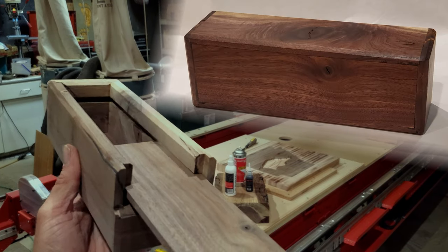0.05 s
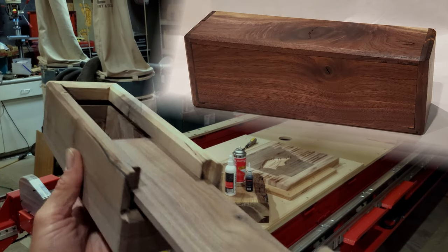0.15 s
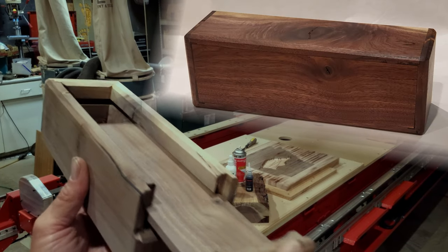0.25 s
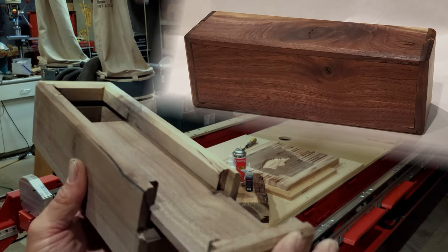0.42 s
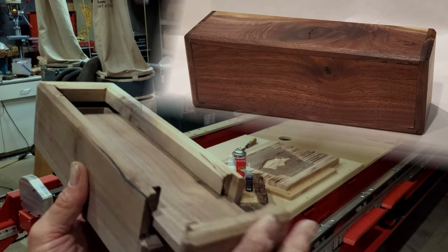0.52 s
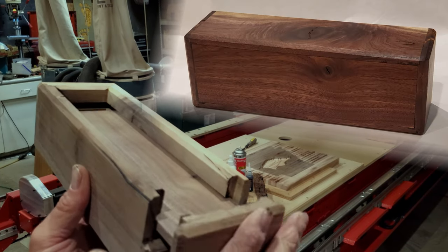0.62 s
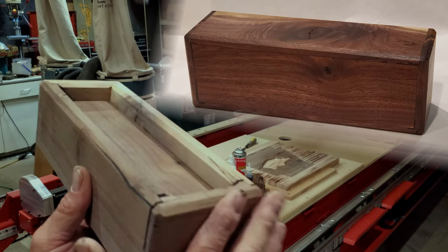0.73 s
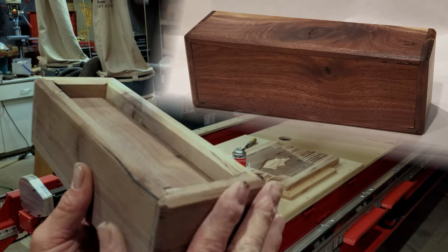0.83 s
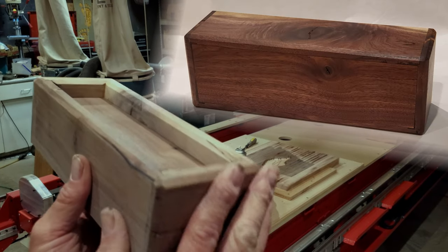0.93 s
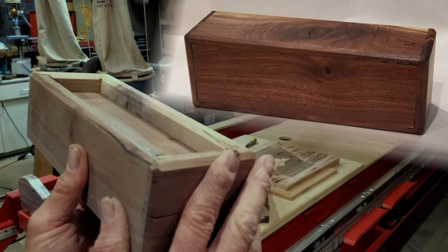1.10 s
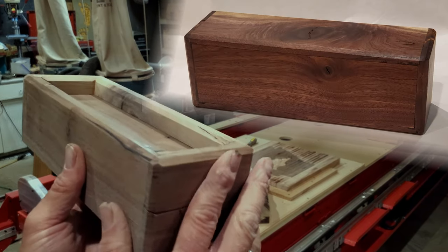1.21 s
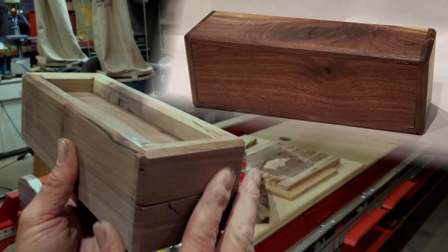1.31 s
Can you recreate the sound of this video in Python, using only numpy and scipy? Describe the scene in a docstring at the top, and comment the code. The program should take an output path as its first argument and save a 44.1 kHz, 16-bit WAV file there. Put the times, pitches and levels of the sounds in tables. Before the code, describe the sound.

Close up in a faintly humming workshop, a small wooden box's lid is pushed along with three hollow scrapes and one short hoot. It closes with a sharp knock and a short echo, followed by light finger taps.

```python
"""A small workshop hums while fingers brush a little wooden box held in the hand.
The lid is pushed along its grooves in three shoves: the rubbing wood hisses and rings a hollow
note that sinks as the box closes. During the first shove the lid catches and hoots briefly.
The third shove ends with the lid knocking shut, and the room answers with a short echo.
Last, the fingers tap and brush the wood again."""
import sys
import numpy as np
from scipy import signal
from scipy.fft import rfft, irfft
from scipy.io import wavfile
from scipy.ndimage import uniform_filter1d

SR = 44100
rng = np.random.default_rng(int(sys.argv[2]) if len(sys.argv) > 2 else 0)


def to_wav(sig):
    """Store sig (one row per channel, or 1-D mono) as 16-bit WAV at the path in sys.argv[1].

    Samples outside -1..1 are clipped; the rate is SR.
    """
    pcm = np.clip(np.atleast_2d(sig), -1, 1) * 32767
    pcm = np.round(pcm).astype(np.int16)
    wavfile.write(sys.argv[1], SR, pcm.T)  # frames by channels


N = 59535
T = np.arange(N) / SR
HZ = np.fft.rfftfreq(2 * N, 1 / SR)

# tone of the room air (frequency [Hz], gain [dB])
AIR_TONE = [(20, -27), (45, -6), (110, -4.5), (150, -7), (210, -4), (380, -10), (520, -11.5), (750, -13),
            (1500, -29.5), (4000, -28), (8000, -33), (15500, -37.5)]
# hum of the machines (pitch [Hz], level [dB], width [Hz])
MACHINE_HUM = [(67.7, -62, 10), (96.7, -64, 2.1), (212.3, -65, 2), (280, -79, 3.5), (376, -70.5, 7.7)]
# rise and fall of air and hum together (time [s], gain [dB])
AIR_AND_HUM_GAIN = [(.1, 2), (.75, 1.5), (1.05, -3.5), (1.3, -4)]
# rumble of the held box (time [s], level [dB])
RUMBLE_LEVEL = [(0, -59), (.25, -59), (.35, -54), (.48, -61), (.62, -55), (.85, -53), (1.05, -63),
                (1.35, -57)]
# echoes off bench, floor and walls (delay [s], gain [dB])
ROOM_ECHOES = [(.0062, -21), (.0145, -17), (.0225, -13.5), (.0402, -23)]
# how long the room rings on (frequency [Hz], time to fade by 60 dB [s])
TAIL_FADE = [(150, 0.31), (550, 0.35), (1400, 0.38), (2300, .41), (4000, 0.35), (7000, .33), (14000, .3)]
# tone of that ringing tail (frequency [Hz], gain [dB])
TAIL_TONE = [(150, -4.5), (550, -3.5), (1400, -5), (2200, -9), (3200, -7.5), (4200, -10.5), (5500, -11),
             (8500, -4.5), (14000, -7)]
# shading of the far microphone, for sound from the box (frequency [Hz], gain [dB])
FAR_TONE = [(70, -3.5), (250, -5.5), (550, -4), (950, -9.5), (1450, -10), (2200, -7), (3000, -8),
            (4000, -8.5), (5500, -18), (8500, -17), (12000, -10)]
# the same for sound from all round the room (frequency [Hz], gain [dB])
FAR_ROOM_TONE = [(150, -1.5), (550, -6), (1400, -6.5), (2200, -8.5), (4000, -10.5), (6000, -15.5),
                 (8500, -14.5), (12000, -4)]
# skin brushing the wood (time [s], level [dB])
BRUSH_LEVEL = [(0, -54.5), (.02, -51), (.045, -66.5), (.14, -65.5), (.5, -94), (.93, -74), (.97, -66.5),
               (1.03, -72), (1.22, -76), (1.25, -57.5), (1.3, -55), (1.35, -54)]
# tone of the brushing (frequency [Hz], gain [dB])
BRUSH_TONE = [(300, -1.5), (700, 0), (1000, -3), (2000, -2.5), (3300, 4), (4200, -1), (4800, 3.5),
              (6500, 6), (8000, -4), (12500, -0.5), (15500, 0.5)]
# fingers settling on the box (time [s], level [dB], treble limit [Hz], fade time [s])
FINGER_TAPS = [(0.899, -35, 1850, 0.01), (.975, -52.5, 3000, .006), (1.122, -53, 12180, .004)]
# the lid meets the end wall, corner after corner (time [s], relative level [dB])
LID_HITS = [(0.764, -12.5), (0.7627, 0), (0.7631, -3), (.7642, -4), (0.7655, -0.5)]
# tone of the crack of each hit (frequency [Hz], gain [dB])
CRACK_TONE = [(60, -48.5), (160, -30), (235, 5), (400, -10), (650, -5.5), (850, -5), (1100, -9.5),
              (1500, -0.5), (1800, -3.5), (2250, 5), (2800, 3.5), (4100, -1.5), (4600, -12), (6200, -18),
              (7600, -34), (11000, -34), (15500, -43)]
# notes the shut box rings with (pitch [Hz], level [dB], time to fade by 60 dB [s])
BOX_NOTES = [(224, -29.5, .1), (276, -31.5, .12), (477, -38, 0.27), (661, -29.5, 0.19), (786, -33, 0.16),
             (864, -21.5, .05), (1102, -26.5, 0.11), (1388, -24.5, 0.31), (1415, -23.5, .25),
             (1553, -8.5, 0.05), (2092, -25, 0.068), (2472, -19, 0.041), (3040, -12, .03),
             (3958, -5.5, 0.016), (5346, -17, 0.02)]
# the lid catches and slips regularly
# (start [s], rise [s], hold [s], release [s], pitch [Hz], glide [Hz/s], level [dB], relative rasp [dB])
LID_CATCHES = [(0.195, 0.011, 0.002, 0.013, 693, -300, -32, -23),
               (0.227, 0.014, 0.0045, .011, 667.4, -400, -24, -34),
               (0.3209, 0.0088, .017, .015, 555.4, -150, -13.5, -13.5)]
# force of the rubbing, shove by shove (time [s], level [dB])
SHOVE_LEVEL = [(.135, -80), (.154, -45), (.195, -36.5), (.245, -34.5), (.275, -33), (.326, -31.5),
               (.342, -55), (.44, -63), (.49, -77.5), (.516, -41.5), (.56, -32), (.598, -33.5),
               (.635, -51.5), (.695, -58), (.73, -36), (.76, -35), (.768, -83)]
# a moment within each of the three shoves (time [s])
SHOVE_TIMES = [.25, .57, .74]
# tone of the rubbing hiss (frequency [Hz], gain [dB])
HISS_TONE = [(100, -26), (220, -15.5), (400, -8.5), (850, -9.5), (1300, -5), (2200, -2), (3700, -2.5),
             (5000, -2.5), (6700, -6.5), (7500, -14.5), (10000, -16.5), (15500, -19.5)]
# notes the lid rings with (pitch [Hz], width [Hz], gain in shove 1 [dB], in 2 [dB], in 3 [dB])
LID_NOTES = [(1291, 210, -13, -12.5, -2), (1995, 120, -9.5, -20, -10.5), (2933, 250, -6.5, 0, -11.5),
             (4535, 220, -16, -13.5, -8), (6500, 294, -8, -23.5, -18)]
# hollow note of the closing box (time [s], pitch [Hz], level relative to the rubbing [dB])
HOLLOW_NOTE = [(.15, 770, -8), (.21, 674, -4), (.26, 678, -3), (.31, 605, -3), (.53, 530, -4.5),
               (.6, 533, -3.5), (.66, 468, 4), (.75, 504, -7)]

TREBLE_LIMIT_HZ = 15850


def amp(db):
    """Turns decibels into a number to multiply by."""
    return 10 ** (np.asarray(db) / 20)


def unit(x):
    """Scales a sound to an average strength (rms) of 1."""
    return x / np.sqrt(np.mean(x ** 2) + 1e-20)


def curve(rows):
    """Draws each column of a time table as a line through every sample."""
    times, *columns = np.transpose(rows)
    return [np.interp(T, times, column) for column in columns]


def read(points, hz):
    """Looks up a frequency table, with the octaves evenly spaced."""
    frequencies, values = np.transpose(points)
    return np.interp(np.log(hz + 1), np.log(frequencies), values)


def colour(x, tone):
    """Gives a sound the tone in a table; the filter rings only after the sound, never before."""
    log_gain = np.log(amp(read(tone, abs(np.fft.fftfreq(2 * N, 1 / SR)))))
    response = np.exp(np.conj(signal.hilbert(log_gain)))[:N + 1]
    return irfft(rfft(x, 2 * N) * response)[..., :N]


def resonate(x, hz, width):
    """Makes a sound ring around a steady or moving pitch."""
    turn = np.exp(2j * np.pi * np.cumsum(hz * np.ones(N)) / SR)
    decay = np.exp(-np.pi * width / SR)
    # shift the pitch down to zero, smooth, then shift back up
    smoothed = signal.lfilter([(1 - decay) ** 2], [1, -2 * decay, decay ** 2], x / turn)
    return unit((turn * smoothed).real)


def drone(hz, width):
    """Steady narrow noise around one pitch."""
    spectrum = rfft(rng.standard_normal(2 * N))
    return unit(irfft(spectrum / (1 + (2 * (HZ - hz) / width) ** 4))[:N])


def drift():
    """A slow random wobble."""
    return drone(0, width=50)


def both_sides(pair):
    """Sound from all round the room is duller at the far microphone."""
    return np.array([pair[0], colour(pair[1], FAR_ROOM_TONE)])


def background():
    """Room air, machine hum and the rumble of the held box; the bass is alike on both sides."""
    shared = colour(rng.standard_normal(N), [(300, -1), (2000, -8.5)])
    apart = colour(rng.standard_normal((2, N)), [(150, -6.5), (1200, -0.5)])
    air = amp(-59.5) * both_sides(unit(colour(shared + apart, AIR_TONE)))
    hum = sum(amp(db) * drone(hz, width) for hz, db, width in MACHINE_HUM)
    rumble = amp(curve(RUMBLE_LEVEL)[0]) * drone(hz=62, width=30)
    return (air + hum) * amp(curve(AIR_AND_HUM_GAIN)[0]) + rumble


def room_tail(sound, echoes_per_s=4000, build_up_s=0.013):
    """Countless small echoes blur into a short fading tail."""
    echoes = rng.standard_normal((2, N)) * (rng.random((2, N)) < echoes_per_s / SR)
    hz, t, bands = signal.stft(echoes, SR, nperseg=256)
    fade = amp(-60 * t / read(TAIL_FADE, hz)[:, None])
    tail = signal.istft(bands * fade, SR, nperseg=256)[1][:, :N]
    tail *= np.minimum(T / build_up_s, 1)
    tail = colour(unit(tail) / np.sqrt(N), TAIL_TONE)
    return both_sides(signal.fftconvolve(sound[None], tail, axes=1)[:, :N])


def workshop(sources, far_lag_s=0.00013):
    """Each (sound, gain into the room [dB]) reaches the left microphone first and sets off echoes."""
    direct = sum(sound for sound, db in sources)
    sent = sum(sound * amp(db) for sound, db in sources)
    echoes = sum(amp(db) * np.interp(T - delay, T, sent, left=0) for delay, db in ROOM_ECHOES)
    near = direct + colour(echoes, [(1800, -0.5), (5000, -13)])
    far = np.interp(T - far_lag_s, T, colour(near, FAR_TONE), left=0)
    return np.array([near, far]) + room_tail(sent)


def friction(slips_per_s=14000, spread_db=2.0, flutter_db=0.2):
    """Rubbing is a stream of tiny slips of uneven size, with a slight flutter."""
    size = amp(spread_db * np.minimum(rng.exponential(1, N), 4)) * rng.standard_normal(N)
    flutter = unit(uniform_filter1d(rng.standard_normal(N), size=300))
    slipping = rng.random(N) < slips_per_s / SR
    return unit(size * slipping * amp(flutter_db * flutter))


def fingers():
    """Skin brushes over the wood and fingertips land with soft taps."""
    out = amp(curve(BRUSH_LEVEL)[0]) * unit(colour(friction(), BRUSH_TONE))
    for start, db, hz, fade_s in FINGER_TAPS:
        puff = rng.standard_normal(N) * (T > start) * np.exp(-abs(T - start) / fade_s)
        dulled = signal.lfilter(*signal.butter(4, hz, fs=SR), puff)
        out += amp(db) * dulled * np.sqrt(SR / (2 * hz))  # makes up the strength lost in dulling
    return out


def knock(crack_db=15, splinter_gain=0.067, splinter_s=0.002, ring_rise_s=0.001):
    """The lid hits the end wall with quick splintery cracks, and the shut box rings."""
    cracks = np.zeros(N)
    for start, db in LID_HITS:
        t = T - start
        click = signal.unit_impulse(N, round(start * SR))
        splinters = splinter_gain * rng.standard_normal(N) * (t > 0) * np.exp(-abs(t) / splinter_s)
        cracks += amp(db + crack_db) * (click + splinters)
    first_hit = min(start for start, db in LID_HITS)
    t = np.maximum(T - first_hit, 0)
    ring = sum(amp(db - 60 * t / fade_s) * np.sin(2 * np.pi * hz * t) for hz, db, fade_s in BOX_NOTES)
    return colour(cracks, CRACK_TONE) + ring * (1 - np.exp(-t / ring_rise_s))


def hoot(start, rise, hold, release, hz, glide, db, rasp_db, rasp_s=0.014):
    """The lid sticks and slips near the pitch of the hollow note: raspy at first, then nearly pure."""
    t = np.maximum(T - start, 0)
    swell = np.interp(t, np.cumsum([0, rise, hold, release]), [0, 1, 1, 0])
    phase = 2 * np.pi * (hz * t + glide * t ** 2 / 2)
    overtones = sum(np.sin(k * phase) / k for k in range(2, 6))
    rasp = 0.45 * overtones + resonate(friction(), hz=1347, width=600)
    rasp_fade = (t > 0) * np.exp(-t / rasp_s)
    return amp(db) * (swell * np.sin(phase) + amp(rasp_db) * rasp_fade * rasp)


def scrape(hiss_db=-2.5, swell_db=2.0, wander_share=0.0092):
    """Rubbing in the grooves hisses, makes the lid ring and sounds the sinking hollow note."""
    out = amp(hiss_db) * unit(colour(friction(), HISS_TONE))
    for hz, width, *shove_db in LID_NOTES:
        # each note wanders and swells as the points of contact move
        ring = resonate(friction(), hz * (1 + wander_share * drift()), width)
        ring = unit(ring * amp(swell_db * drift()))
        out += amp(np.interp(T, SHOVE_TIMES, shove_db)) * ring
    hollow_hz, hollow_db = curve(HOLLOW_NOTE)
    out += amp(hollow_db) * resonate(friction(), hollow_hz, width=153)
    return out * amp(curve(SHOVE_LEVEL)[0])


def scene():
    """The box is slid shut in the humming workshop."""
    hoots = sum(hoot(*row) for row in LID_CATCHES)
    return background() + workshop([(scrape(), -6.5), (hoots, -6.5), (knock(), -1), (fingers(), -9)])


def record(dry):
    """Cuts away the very highest treble."""
    low_pass = signal.firwin(511, TREBLE_LIMIT_HZ, window=("kaiser", 9), fs=SR)
    return signal.oaconvolve(dry, low_pass[None], "same")


dry = scene()
out = record(dry)
to_wav(out)
```